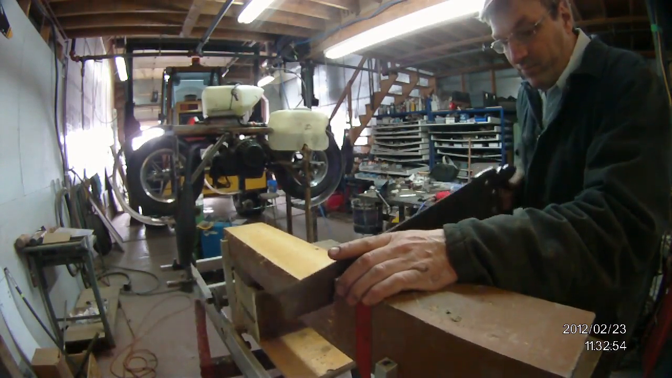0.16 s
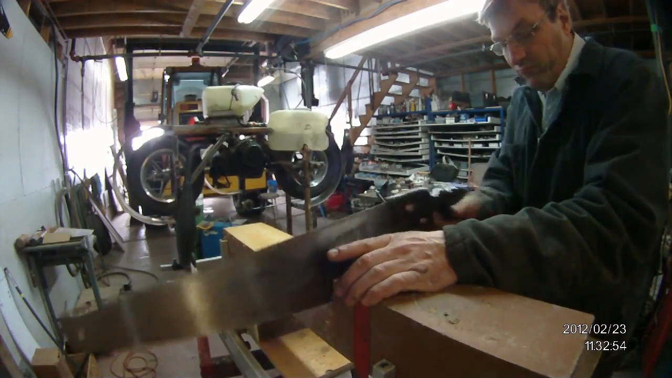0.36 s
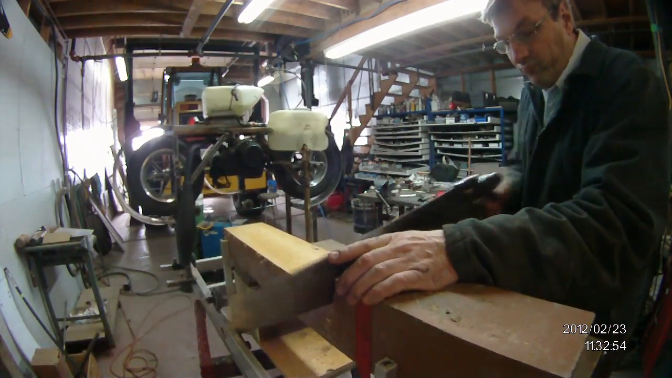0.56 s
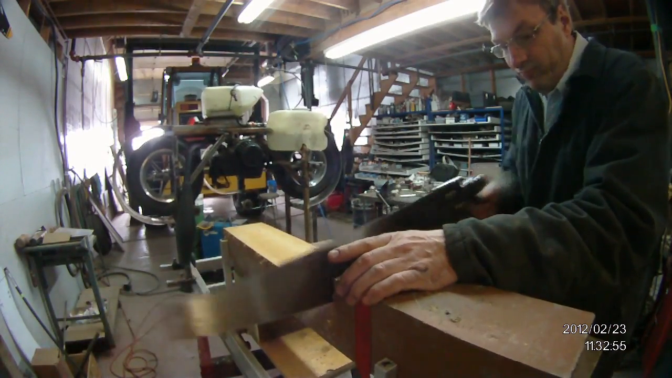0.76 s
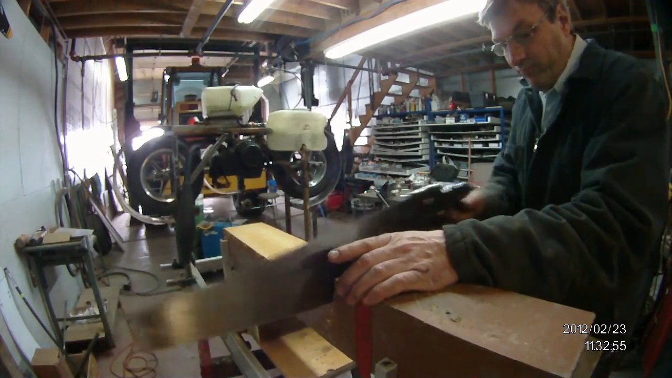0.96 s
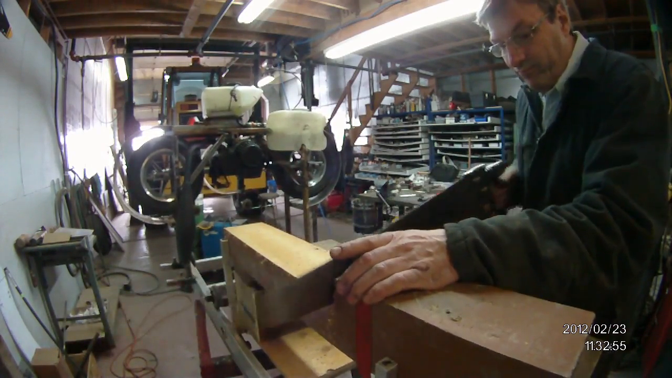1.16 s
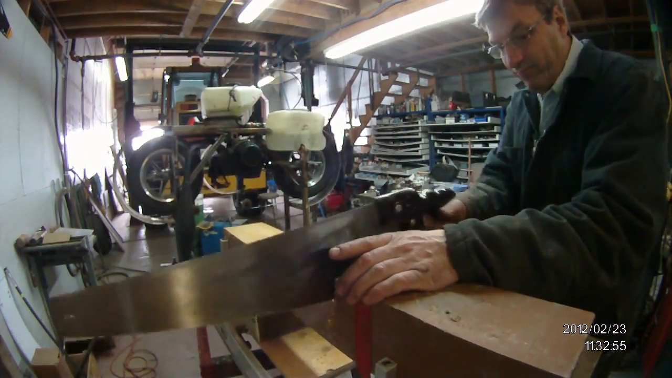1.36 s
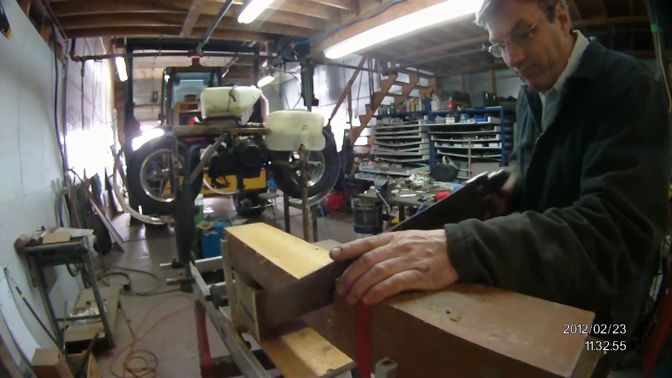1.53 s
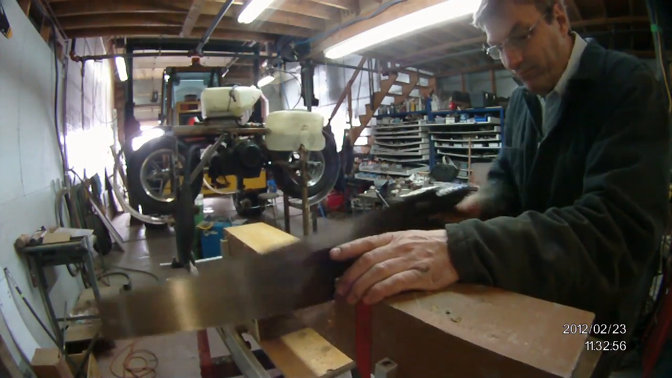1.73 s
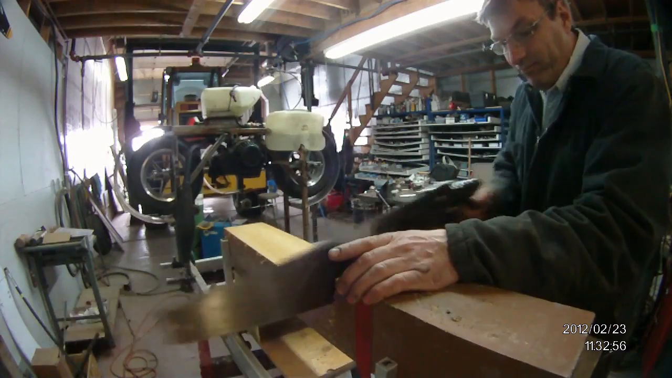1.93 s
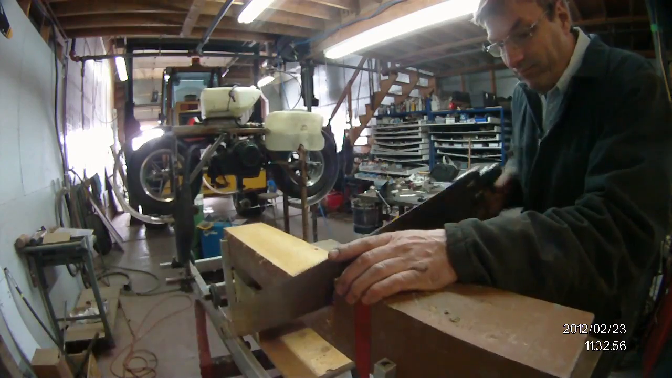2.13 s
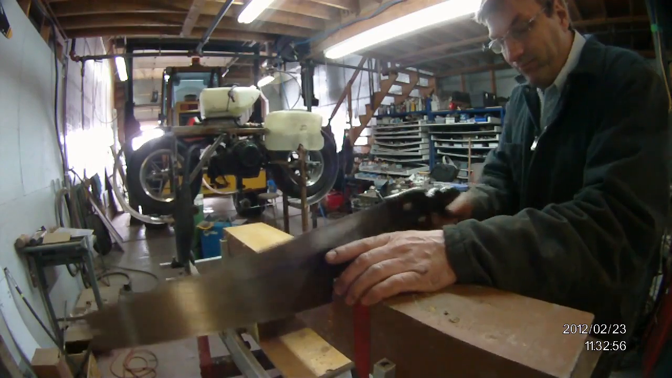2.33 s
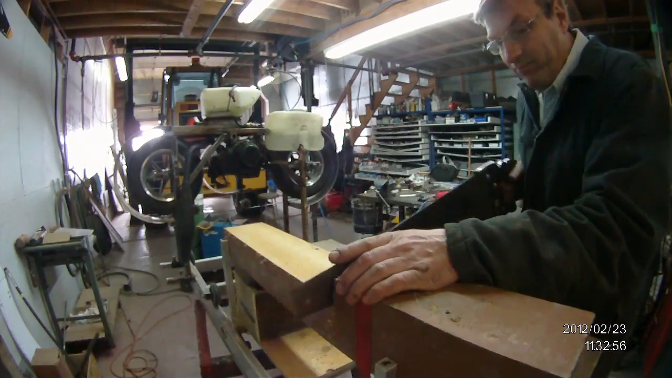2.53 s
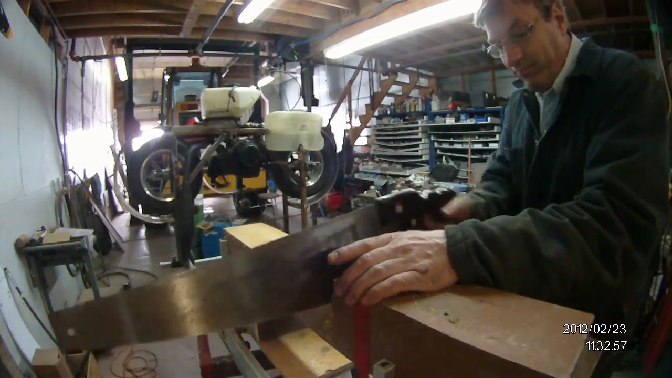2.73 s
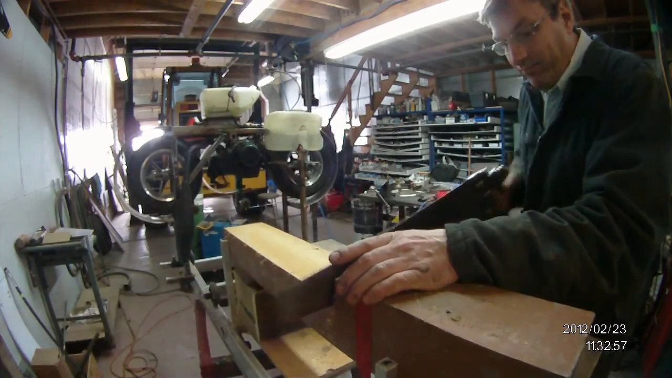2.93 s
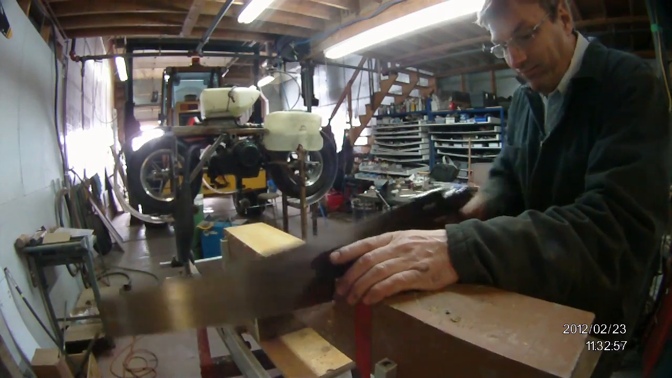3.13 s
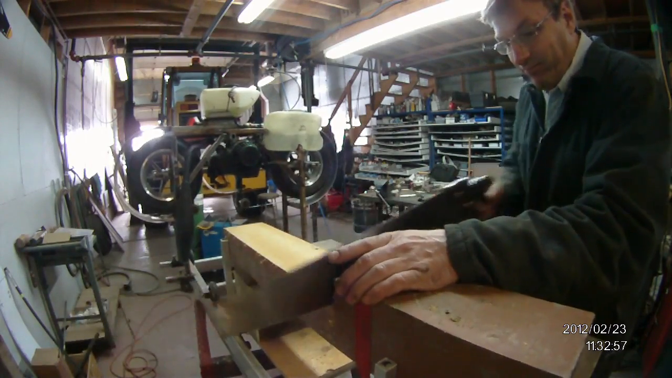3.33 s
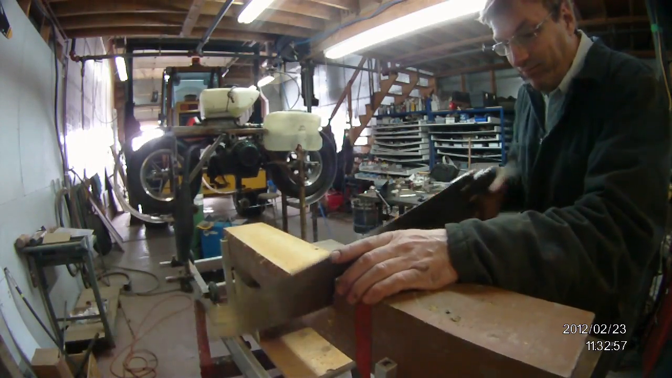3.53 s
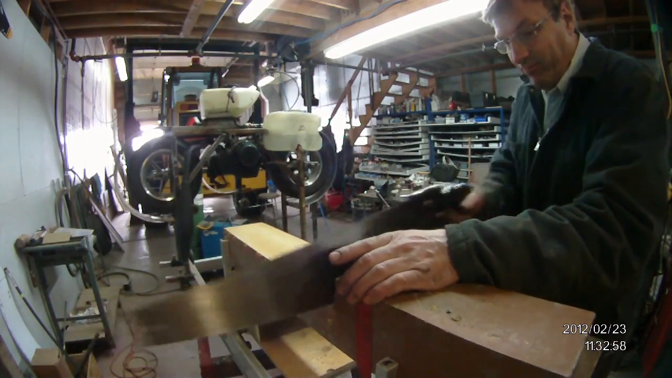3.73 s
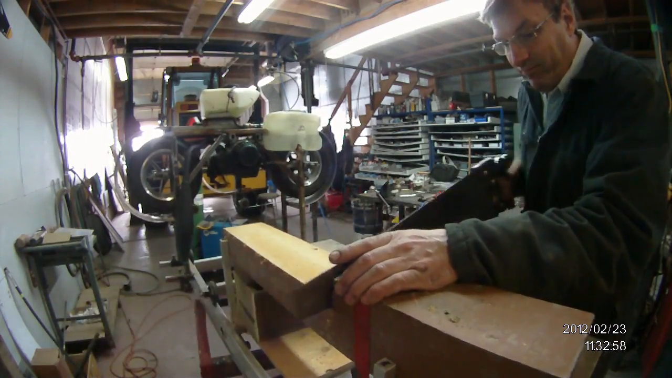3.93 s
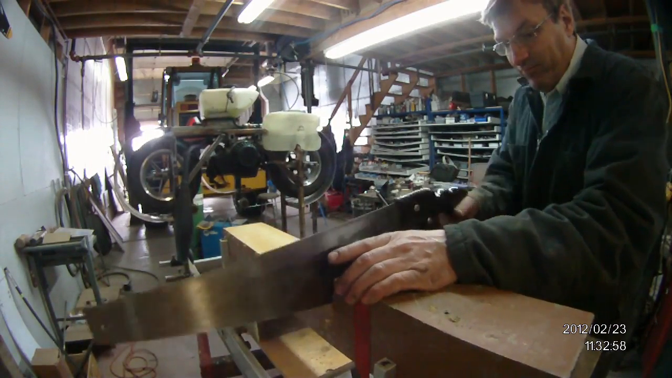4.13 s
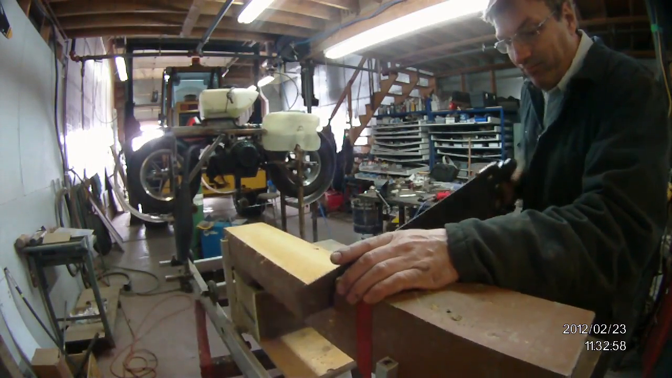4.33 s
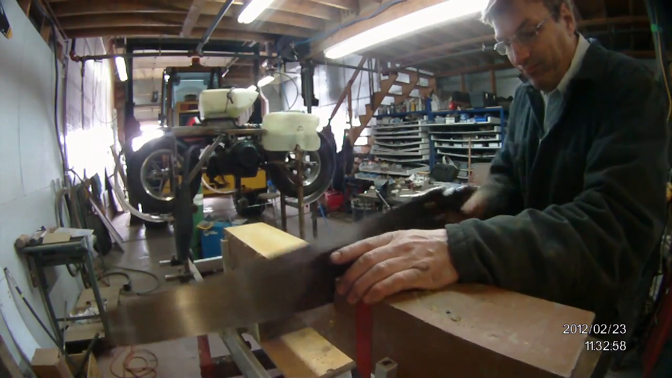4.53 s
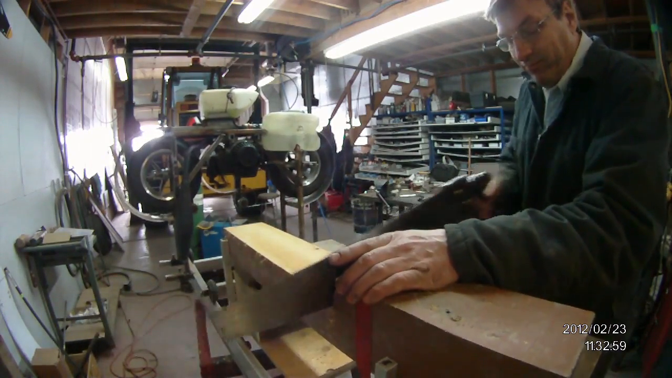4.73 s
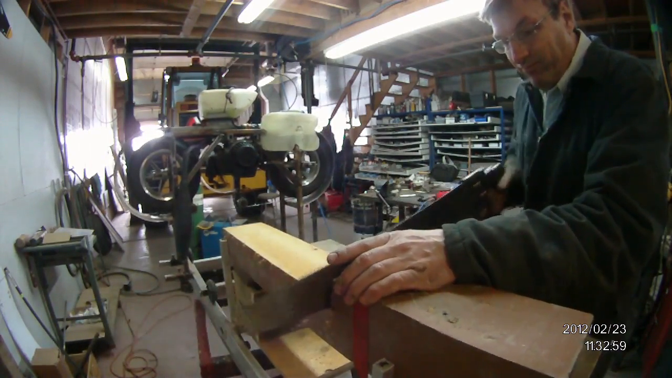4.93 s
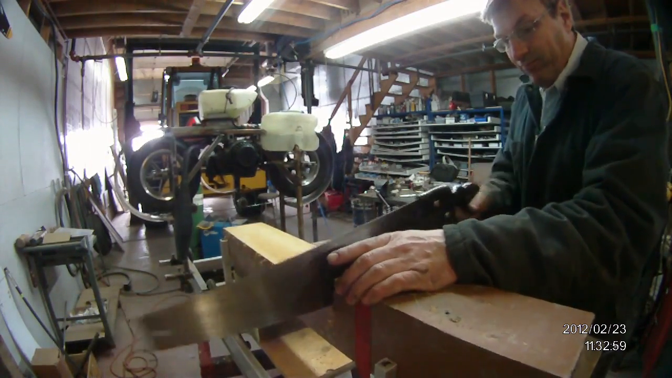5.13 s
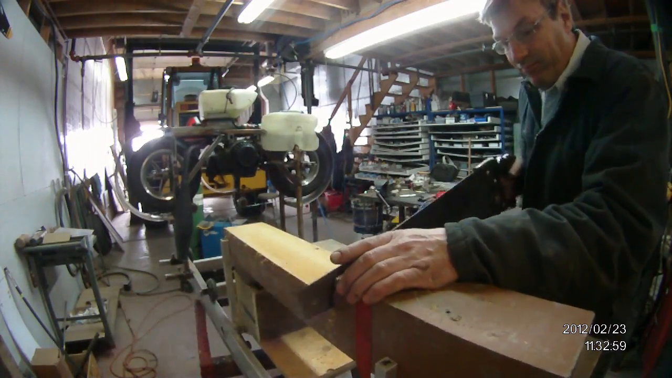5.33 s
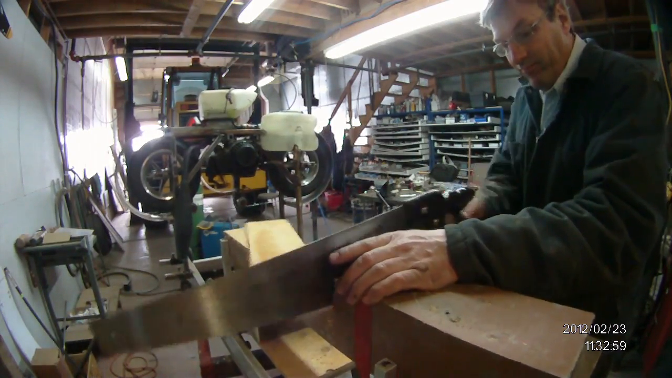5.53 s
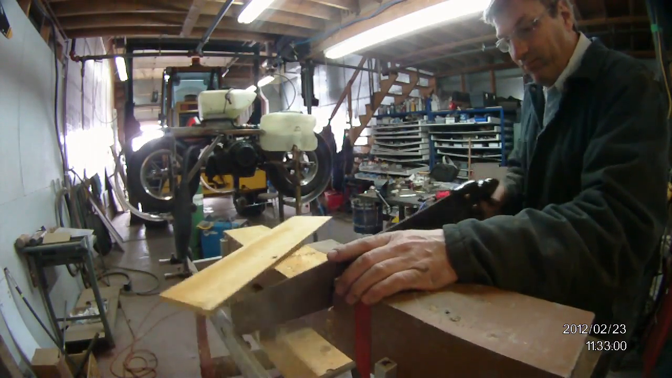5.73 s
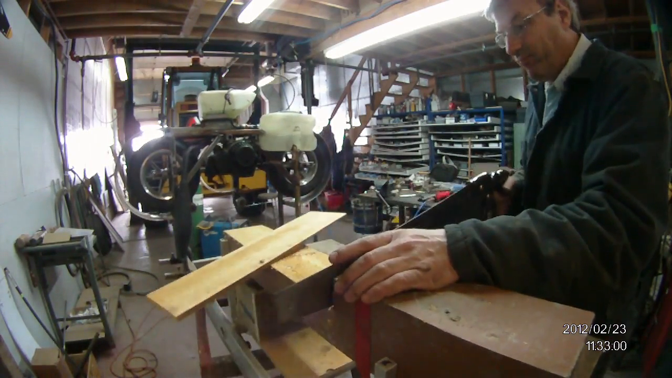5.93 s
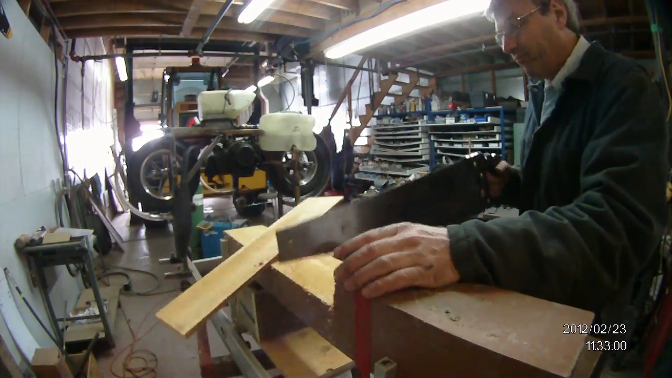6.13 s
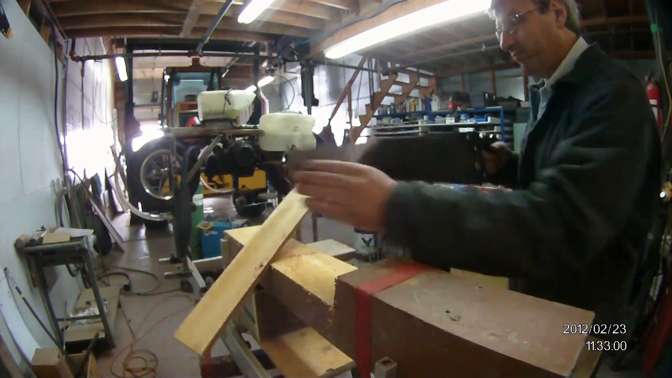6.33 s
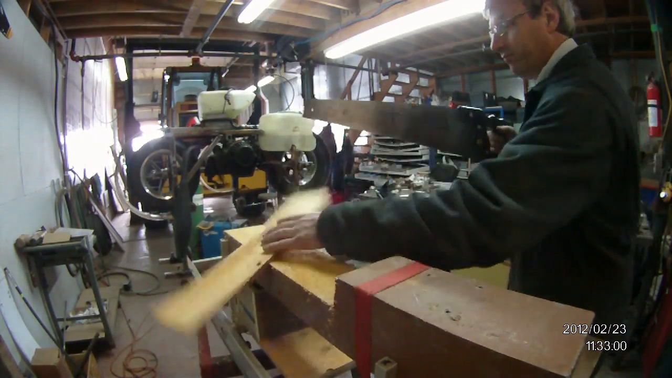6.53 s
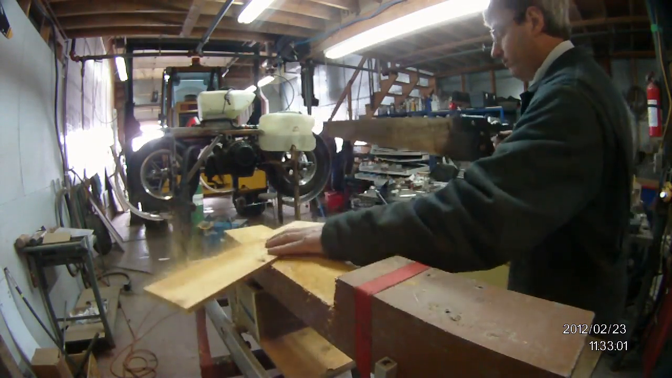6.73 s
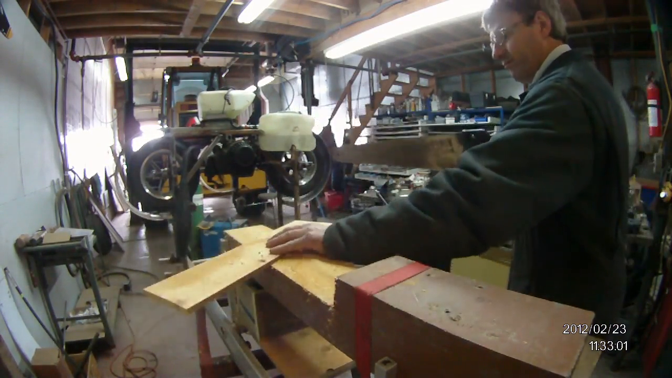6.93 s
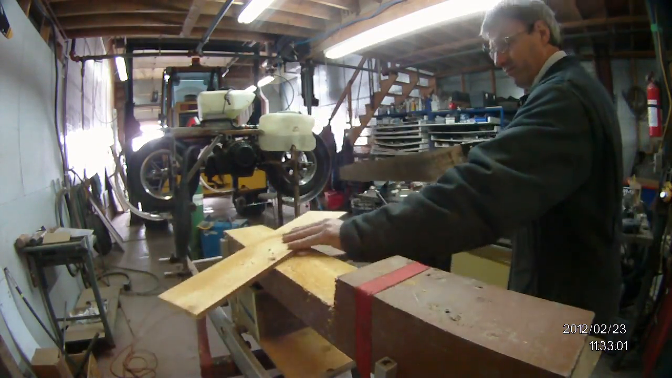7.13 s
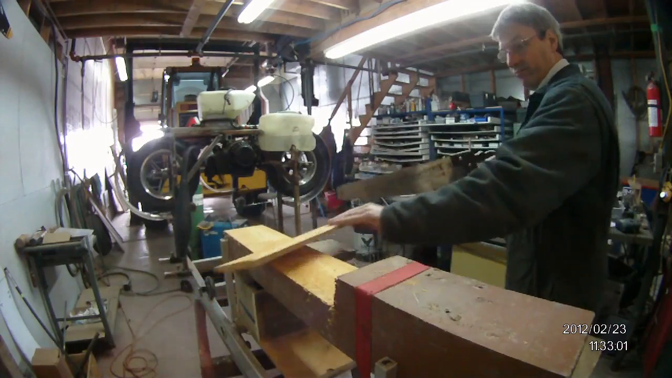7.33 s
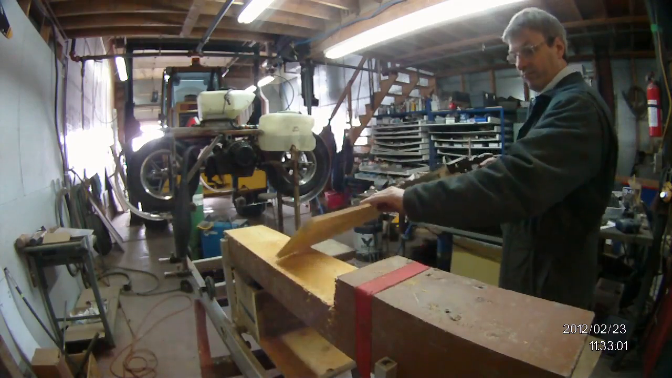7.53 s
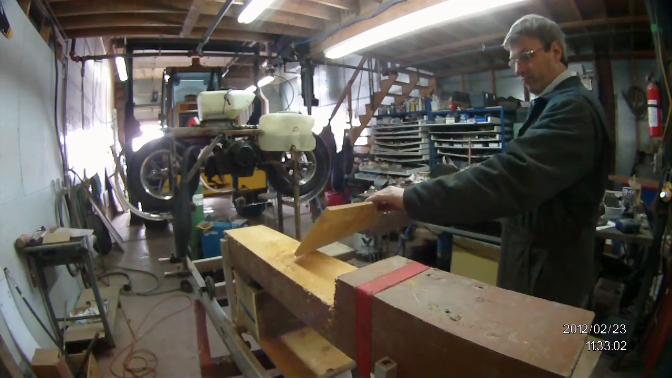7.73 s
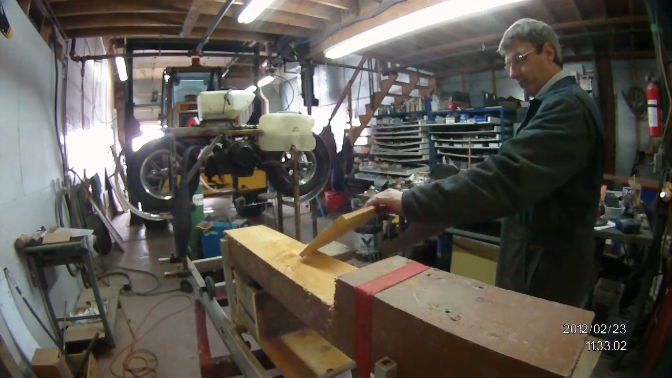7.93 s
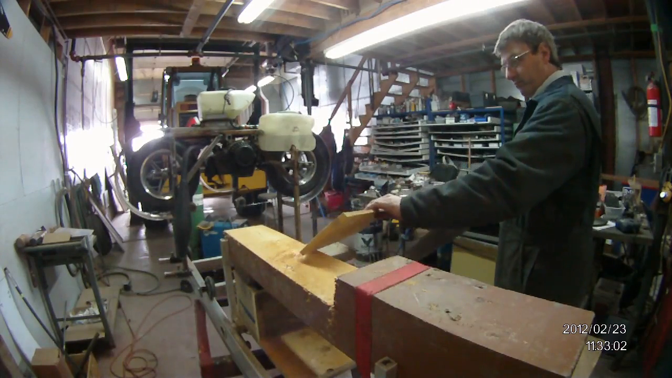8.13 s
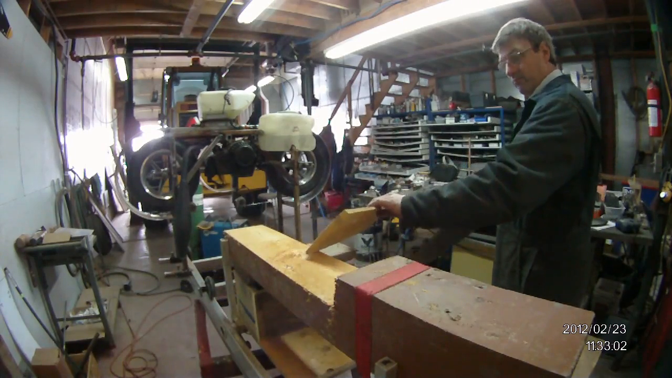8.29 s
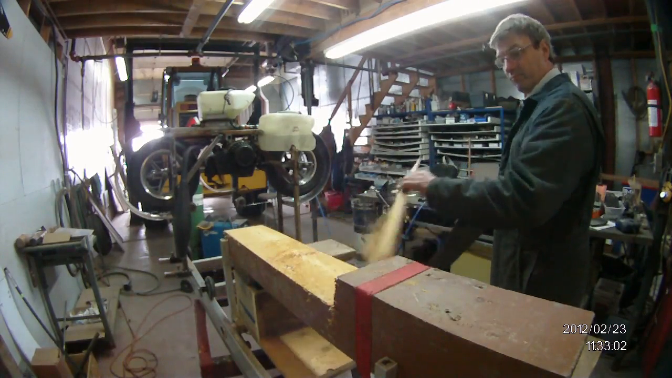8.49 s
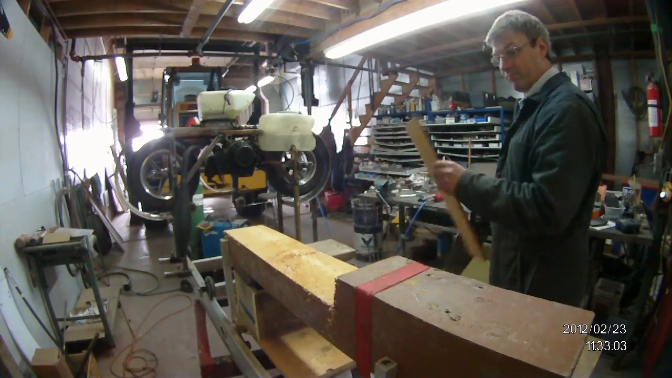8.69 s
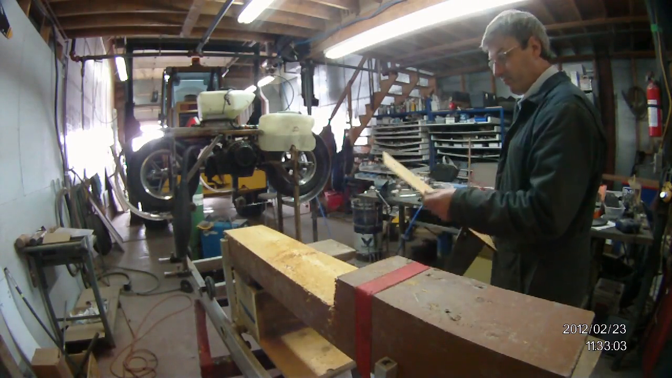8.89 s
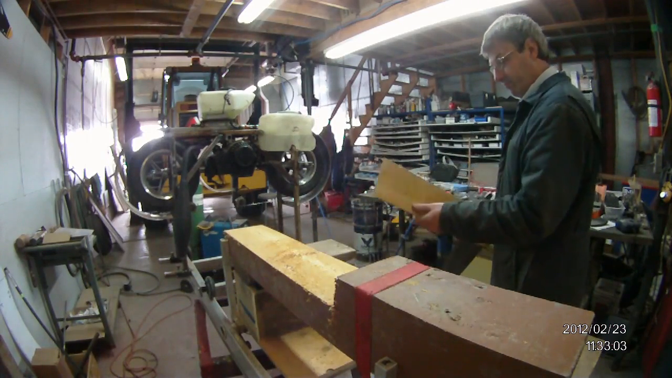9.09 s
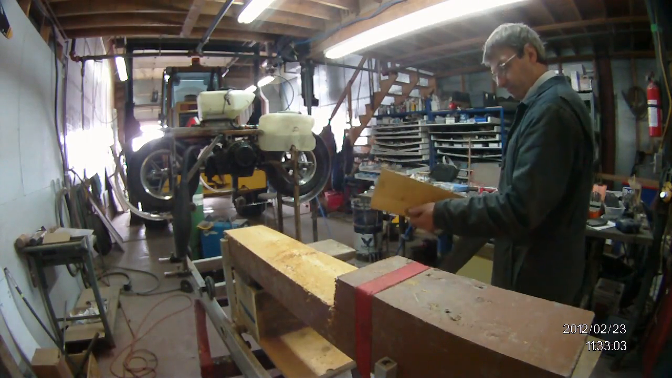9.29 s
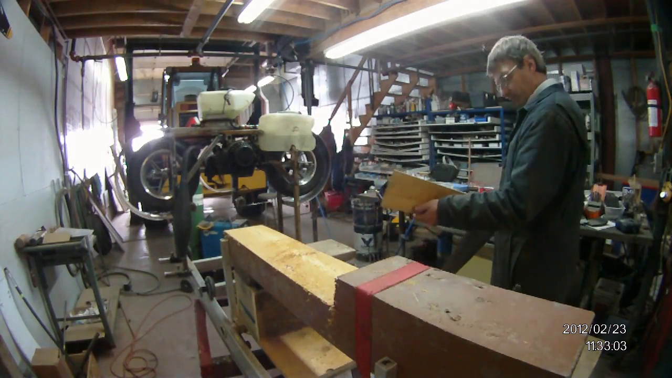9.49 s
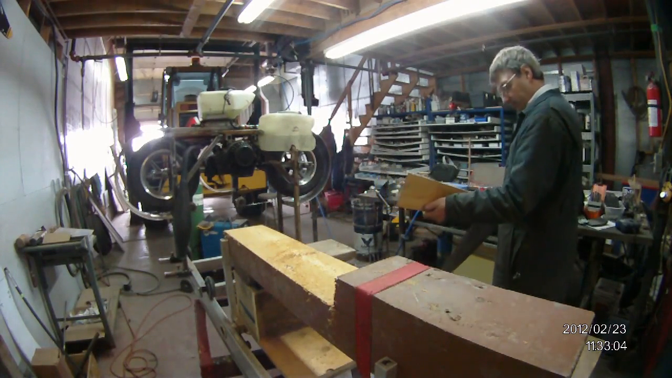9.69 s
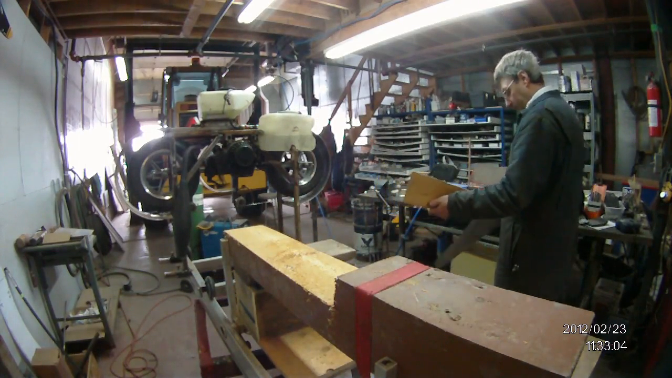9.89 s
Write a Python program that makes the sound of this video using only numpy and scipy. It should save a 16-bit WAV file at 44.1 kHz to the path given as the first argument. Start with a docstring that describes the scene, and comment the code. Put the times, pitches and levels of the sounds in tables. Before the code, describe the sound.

In a quiet workshop with a slight echo, a handsaw cuts a wooden beam in quick, even strokes, crisp on the push and duller on the pull. The blade squeaks briefly as it pinches, and the sawing ends a little past halfway. A few light wooden taps and soft sliding scrapes follow as the cut piece comes away. A faint, fluttering motor whirr continues close to the microphone.

```python
"""A handsaw rasps through a wooden beam in a workshop, about two strokes to and fro a second.
Tooth impacts excite the resonances of beam and blade, and tearing fibres add noise, most on the push.
Late in the cut the blade binds and squeals by stick-slip friction. The sawing stops, and the offcut
taps the beam and slides off it. A small motor whirrs throughout, rubbing on every turn."""
import sys
import numpy as np
from scipy import signal
from scipy.fft import rfft, irfft, next_fast_len
from scipy.io import wavfile

SR = 44100
rng = np.random.default_rng(int(sys.argv[2]) if len(sys.argv) > 2 else 0)


def generate_wav(signal):
    """Clip the signal to [-1, 1] and save it as 16-bit WAV at the path in sys.argv[1]."""
    frames = np.transpose(np.atleast_2d(signal))
    scaled = np.clip(frames, -1, 1) * 32767
    pcm = np.round(scaled).astype(np.int16)
    wavfile.write(sys.argv[1], SR, pcm)


N = 438794
TIME = np.arange(N) / SR

# Spectra of the motor's whirr and of its throb. Each row: frequency in Hz, relative gain in dB.
WHIRR_SPECTRUM = [(30, -29.5), (110, -24.5), (220, -19.5), (420, -7), (780, -7.5), (1450, 1), (1850, -13.5),
                  (2400, -7), (3400, -7.5), (5200, -9.5), (6900, -21), (7800, -15), (9500, -29),
                  (15000, -34.5)]
THROB_SPECTRUM = [(100, -32), (350, -14.5), (640, 6.5), (850, -9), (1850, -0.5), (2500, 0), (3300, -2.5),
                  (4600, 3), (6000, -4), (6800, -10), (8600, -12), (11000, -17.5), (13000, -22)]
# Steady tones of the motor. Each row: frequency in Hz, rms level in dB.
WHINE_TONES = [(120, -93), (241, -89), (360.4, -74), (399, -82.5), (438, -83.5), (479, -81.5), (618, -86),
               (657, -82.5), (958, -77.5), (1056, -83), (1176, -84), (1276, -74), (2272, -76.5),
               (7838, -80.5), (7897, -88.5)]
# Spots that rub once a turn. Each row: position in turns, half length in turns, centre frequency in Hz,
# nominal bandwidth in Hz, rms level in dB.
MOTOR_RUBS = [(0, 0.25, 3904, 280, -74), (0, 0.27, 5300, 200, -73.5), (0.079, 0.53, 6100, 130, -76),
              (.05, 0.33, 2670, 350, -75), (.38, 0.28, 1387, 250, -72), (.52, 0.059, 4770, 300, -78)]

# The offcut striking the beam. Each row: start in seconds, level in dB, decay time in seconds,
# centre of the excited band in Hz.
OFFCUT_TAPS = [(6.597, -51, .004, 4000), (6.601, -53, 0.0061, 300), (6.684, -53.5, 0.0037, 4500),
               (6.715, -52.5, 0.0095, 750), (6.725, -52, 0.013, 950)]
# The offcut sliding on the beam. Each row: midpoint in seconds, half length in seconds, level in dB.
OFFCUT_SLIDES = [(7.312, 0.072, -66), (7.463, 0.11, -65.5), (7.646, .06, -67), (8.05, 0.073, -75),
                 (8.52, .06, -63)]
# Broad responses to tapping and to sliding. Each row: frequency in Hz, relative gain in dB.
TAP_SPECTRUM = [(30, -48), (150, -22), (230, -3), (400, -2), (750, -2), (1300, 2), (1900, -8), (4300, -5),
                (7000, -19), (15000, -32)]
SLIDE_SPECTRUM = [(40, -42), (200, -17), (700, -10), (1350, 9), (1800, -3), (2400, 4), (3400, 4.5),
                  (4600, 4), (6000, -23), (15000, -34)]
# Resonances of the offcut, then of beam and blade. Each row: frequency in Hz, bandwidth in Hz,
# strength in dB relative to the broad response.
TAP_MODES = [(227, 23, -3), (730, 70, -10), (1040, 60, 7), (1420, 80, 8)]
BEAM_BLADE_MODES = [(283, 20, 3.5), (466, 24, 5.5), (989, 59, 3.5), (1430, 86, 11.5), (2080, 76, 6),
                    (2280, 76, -4), (2560, 90, -3), (4260, 160, 1), (5900, 80, 1)]

# The blade binding in the kerf. Each row: start in seconds, length in seconds, first pitch in Hz,
# pitch approached in Hz, level in dB.
BLADE_SQUEALS = [(4.565, 0.052, 1500, 1277, -48), (4.838, 0.068, 1430, 1476, -47.5),
                 (5.03, .19, 950, 1477, -41.5)]
# Broad responses to tearing, tooth impact and load. Each row: frequency in Hz, relative gain in dB.
RASP_SPECTRUM = [(200, -41), (700, -15), (1200, -1), (1750, -10.5), (2170, -6.5), (2400, -3), (2850, -3.5),
                 (3300, -1), (4500, 2.5), (5300, -8.5), (7000, -16), (8200, -18), (10000, -27),
                 (15000, -33.5)]
KNOCK_SPECTRUM = [(60, -44), (140, -22), (250, -16), (400, -3.5), (650, -3), (1200, 0.5), (1480, -2),
                  (1750, -18), (3000, -9), (6000, -24), (15000, -34)]
SHUDDER_SPECTRUM = [(60, -31), (170, -15.5), (290, -2.5), (450, 0), (800, -3.5), (1400, 0.5), (2500, -28.5),
                    (15000, -53)]
# Cycles of the saw, out and back. Each row: push start in seconds, pull start in seconds,
# base push level in dB, base pull level in dB, peak tooth rate of the pull in Hz.
SAW_CYCLES = [(-.15, .079, -39.5, -46, 1200), (.299, .547, -42, -46.5, 1120),
              (.790, 1.008, -40.5, -46, 720), (1.245, 1.478, -40.5, -45.5, 1300),
              (1.713, 1.952, -40, -45.5, 1280), (2.187, 2.42, -39.5, -44.5, 1230),
              (2.661, 2.883, -39.3, -45.5, 1250), (3.11, 3.342, -39, -45.5, 1220),
              (3.559, 3.797, -40, -45.5, 1220), (4.034, 4.268, -41, -46, 1196),
              (4.504, 4.741, -39.5, -45.5, 1145.6), (4.972, 5.228, -42.5, -49, 1050),
              (5.462, 5.69, -41, -53, 646)]


def undb(db):
    """Amplitude grows tenfold for every 20 dB."""
    return 10 ** (np.asarray(db) / 20)


def unit(x):
    """Normalisation to an rms of 1."""
    return x / np.sqrt(np.mean(x ** 2))


def body(points, modes=(), tilt_db=0, size=8192):
    """Minimum-phase response of unit energy: resonances on a broad curve, tilted in dB per octave."""
    hz = np.maximum(np.fft.rfftfreq(size, 1 / SR), 1)
    point_hz, point_db = np.transpose(points)
    gain = undb(np.interp(np.log(hz), np.log(point_hz), point_db) + tilt_db * np.log2(hz))
    peaks = sum(undb(db) ** 2 / (1 + (2 * (hz - centre) / width) ** 2) for centre, width, db in modes)
    cepstrum = irfft(np.log(gain * np.sqrt(1 + peaks)))
    cepstrum[size // 2:] = 0
    response = irfft(np.exp(2 * rfft(cepstrum)))
    return response / np.linalg.norm(response)


def through(x, response):
    """A linear system convolves its input with its impulse response."""
    return signal.fftconvolve(x, response)[:N]


def bandpass(x, hz, width):
    """A second-order resonance with unit gain at its centre."""
    return signal.lfilter(*signal.iirpeak(min(hz, SR / 3), hz / width, fs=SR), x)


def walk(rate):
    """Random modulation with a spread near 1, gliding to a new value rate times a second."""
    knots = rng.standard_normal(N // 4)
    return np.interp(TIME * rate, np.arange(len(knots)), knots) * np.sqrt(3 / 2)


def burst(start, decay):
    """Impact noise: a sudden onset and an exponential decay."""
    age = np.maximum(TIME - start, 0)
    return (TIME >= start) * np.exp(-np.minimum(age / decay, 50)) * rng.standard_normal(N)


def workshop(x, t60_s=0.6, wet_db=-5, damp_hz=6000):
    """Reverberation: shelves and machines scatter the sound into a short, dull tail."""
    age = TIME[:SR]
    tail = rng.standard_normal(SR) * np.exp(-np.log(1000) * age / t60_s) * (age > .006)
    tail = signal.sosfilt(signal.butter(1, damp_hz, fs=SR, output="sos"), tail)
    return x + undb(wet_db) * through(x, tail / np.linalg.norm(tail) / 2)


def motor(turn_hz=19.94, throb_depth_db=8.5, slip_s=.00002, fresh=0.2):
    """Periodic friction: the same rough spots rub on every turn, over a whine and a soft hiss."""
    turn = ((TIME + slip_s * walk(3)) * turn_hz - .40) % 1
    size = int(SR / turn_hz)

    def surface():
        """Roughness repeats with the rotation, apart from a little fresh noise."""
        one_turn = unit(irfft(np.exp(2j * np.pi * rng.random(size // 2 + 1)), size))
        return unit(one_turn[(turn * size).astype(int)] + fresh * rng.standard_normal(N))

    swell = undb(throb_depth_db * np.cos(2 * np.pi * turn))
    throb = undb(-70) * through(unit(swell * surface()), body(THROB_SPECTRUM))
    rough = surface()
    rubs = 0
    for place, half_length, hz, width, db in MOTOR_RUBS:
        distance = (turn - place + .5) % 1 - .5
        contact = np.exp(-(distance / half_length) ** 2)
        band = bandpass(contact * rough, hz, 2 * width)
        rubs = rubs + undb(db) * unit(bandpass(band, hz, 2 * width))
    whirr = undb(-67.5) * through(surface(), body(WHIRR_SPECTRUM, tilt_db=-1.0))
    hiss = undb(-68) * through(rng.standard_normal(N), body(WHIRR_SPECTRUM, tilt_db=0.8))
    whine = sum(undb(db) * np.sqrt(2) * np.sin(2 * np.pi * hz * TIME + 0.54 * walk(4))
                for hz, db in WHINE_TONES)
    return throb + rubs + whirr + hiss + whine


def fibres(snap_db=1.0, patchy_db=2.5, count=12):
    """Fracture noise: fibres of different sizes snap at different pitches, so each band flares alone."""
    size = next_fast_len(N)
    spectrum, hz = rfft(rng.standard_normal(size)), np.fft.rfftfreq(size, 1 / SR)
    register = np.searchsorted(np.geomspace(900, 13000, count - 1), hz)
    bands = (irfft(spectrum * (register == k), size)[:N] for k in range(count))
    return unit(sum(band * undb(snap_db * walk(300) + patchy_db * walk(50)) for band in bands))


def offcut(scrape_spread_db=2):
    """Impact and sliding friction: the loose piece rings as it taps the beam, then scrapes across it."""
    taps = 0
    for start, db, decay, hz in OFFCUT_TAPS:
        ring = bandpass(body(TAP_SPECTRUM, TAP_MODES), hz, width=hz)
        taps = taps + through(undb(db) * burst(start, decay), ring / np.linalg.norm(ring))
    pressure = sum(undb(db) * np.exp(-((TIME - middle) / half) ** 2)
                   for middle, half, db in OFFCUT_SLIDES)
    friction = unit(fibres(patchy_db=4.5) * undb(scrape_spread_db * walk(200)))
    return taps + through(pressure * friction, body(SLIDE_SPECTRUM))


def squeal(settle_s=0.046, waver=0.0201, rough_db=1.5, chatter_db=-18, swell_power=1.1):
    """Stick-slip oscillation of the pinched blade; every third slip is harder, adding a subharmonic."""
    out = 0
    for start, length, first_hz, settled_hz, db in BLADE_SQUEALS:
        age = np.clip(TIME - start, 0, length)
        hz = settled_hz + (first_hz - settled_hz) * np.exp(-age / settle_s)
        phase = 2 * np.pi * np.cumsum(hz * (1 + waver * walk(300))) / SR
        level = undb(db + rough_db * walk(200)) * np.abs(np.sin(np.pi * age / length)) ** swell_power
        out = out + level * np.sqrt(2) * (np.sin(phase) + undb(chatter_db) * np.sin(phase / 3))
    return out


def arm(push_tooth_hz=1008, fastest_share=.485, last_peak_s=5.735, rest_s=5.87):
    """Reciprocating motion: the blade's speed rises from 0 to 1 and falls back within each stroke."""
    push_s, pull_s, push_db, pull_db, pull_tooth_hz = np.transpose(SAW_CYCLES)
    starts = np.sort(np.append(push_s, pull_s))
    fastest = np.append(starts[:-1] + fastest_share * np.diff(starts), last_peak_s)
    marks = np.sort(np.concatenate([starts, fastest, [rest_s]]))
    progress = np.interp(TIME, marks, np.arange(len(marks)) / 2)  # counted in strokes
    stroke = np.minimum(progress.astype(int), len(starts) - 1)
    cycle, pushing, along = stroke // 2, stroke % 2 == 0, progress % 1
    tooth_hz = np.where(pushing, push_tooth_hz, pull_tooth_hz[cycle])
    level_db = np.where(pushing, push_db[cycle], pull_db[cycle])
    return np.sin(np.pi * along), pushing, along, TIME - starts[stroke], tooth_hz, level_db


def teeth(rate, jitter=.075, uneven_db=3.5):
    """A quasi-periodic impulse train, one uneven knock per passing tooth, and its phase in cycles."""
    travel = np.cumsum(rate) / SR
    count = int(travel[-1])
    timing, strength = rng.standard_normal((count, 2)).T
    place = np.interp(np.arange(count) + jitter * timing, travel, np.arange(N))
    size = unit(undb(uneven_db * strength))
    index = np.minimum(place.astype(int), N - 2)
    late = place - index  # each impulse is shared between two samples
    knocks = np.bincount(index, size * (1 - late), N) + np.bincount(index + 1, size * late, N)
    return knocks * np.sqrt(SR / rate.max()), travel % 1


def bites(since_turn, delay_s=0.02, decay_s=0.015, snags_s=(2.437, 5.463)):
    """Contact transients: the teeth catch just after each reversal, and twice they snag hard."""
    age = since_turn - delay_s
    catch = (age > 0) * np.exp(-np.abs(age) / decay_s) * rng.standard_normal(N)
    snags = sum(burst(start, decay_s) for start in snags_s)
    return undb(-55) * catch + undb(-44) * snags


def saw(push_knock_db=-6.5, pull_knock_db=-3, fade_db_per_s=0.73, sing_db=-8, saturation=1.38):
    """Forced vibration: tooth impacts and tearing fibres drive beam and blade at the tooth rate."""
    speed, pushing, along, since_turn, tooth_hz, level_db = arm()
    impacts, phase = teeth(speed * tooth_hz * (1 + .015 * walk(20) + .025 * walk(120)))
    force = undb(level_db + 0.4 * walk(70))  # hard and soft grain change the grip
    # The cut deepens with speed until the gullets are full.
    depth = np.tanh(saturation * speed ** 1.91) / np.tanh(saturation)
    tearing = unit(fibres() * np.exp(-phase)) * force * depth * undb(1.4)
    # Teeth skid dully on the pull and cut ever more crisply as the push goes on.
    crispness = pushing * along ** 2
    skidding = tearing * (1 - crispness) + bites(since_turn)
    dull_rasp = through(skidding, body(RASP_SPECTRUM, BEAM_BLADE_MODES, tilt_db=-0.4))
    crisp_rasp = through(tearing * crispness, body(RASP_SPECTRUM, BEAM_BLADE_MODES, tilt_db=1.5))
    # The knocks fade as the deepening kerf steadies the blade.
    knock_db = np.where(pushing, push_knock_db, pull_knock_db) - fade_db_per_s * TIME + 3.5 * walk(90)
    impacts = impacts * force * speed ** 0.28 * undb(knock_db)
    knocks = through(impacts, body(KNOCK_SPECTRUM, BEAM_BLADE_MODES))
    # At the height of a push, teeth and blade fall in step and sing at the tooth rate and its octave.
    tone = np.sin(2 * np.pi * phase) + 0.97 * np.sin(4 * np.pi * phase)
    sing = tone * pushing * speed ** 16 * force * undb(sing_db + 2.6 * walk(40))
    # The loaded beam shudders even while the blade is slow.
    load = rng.standard_normal(N) * undb(3.2 * walk(40)) * speed ** 0.27
    shudder = undb(-61.3) * through(load, body(SHUDDER_SPECTRUM, BEAM_BLADE_MODES))
    return dull_rasp + crisp_rasp + knocks + sing + shudder


def scene():
    """Superposition: saw and offcut reverberate in the room, while the nearby motor is heard direct."""
    return (workshop(saw() + squeal() + offcut()) + motor())[None]


def record(dry, cutoff_hz=15300):
    """A steep low-pass filter removes the highest treble."""
    return signal.sosfilt(signal.ellip(10, .2, 70, cutoff_hz, fs=SR, output="sos"), dry)


dry = scene()
out = record(dry)
generate_wav(out)
```